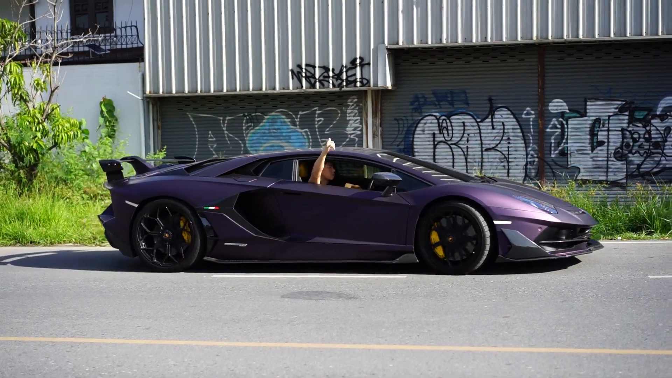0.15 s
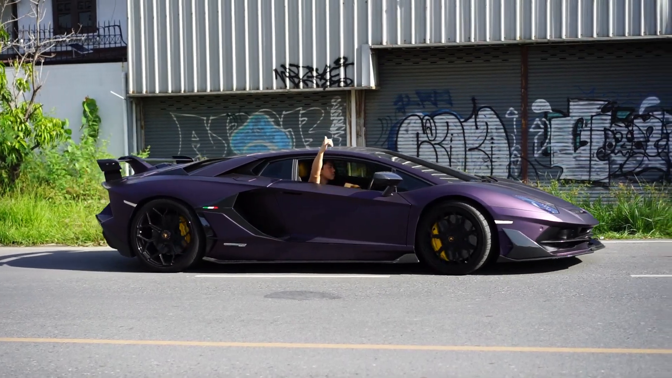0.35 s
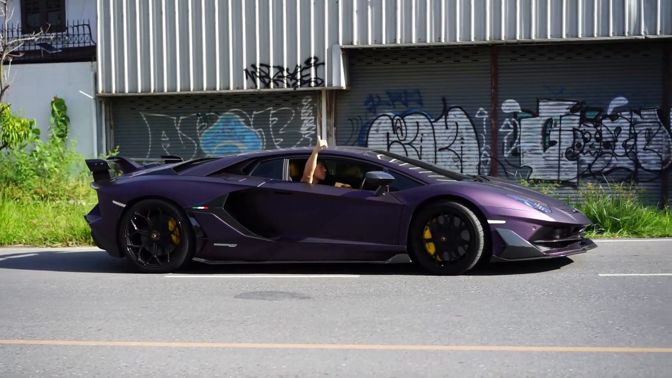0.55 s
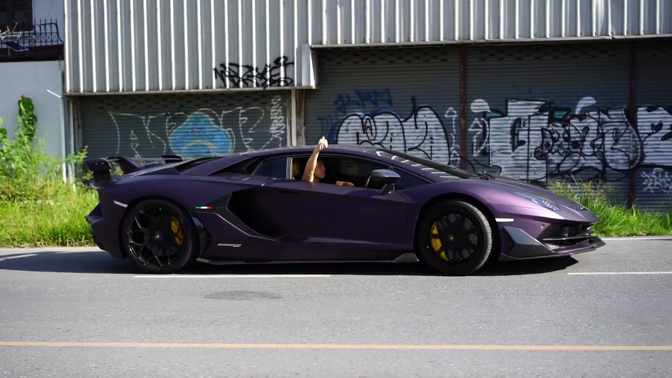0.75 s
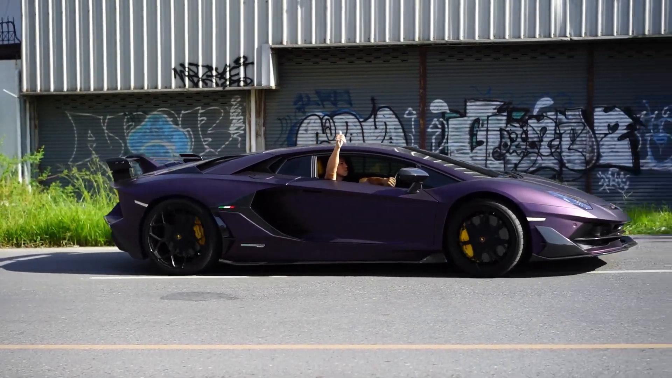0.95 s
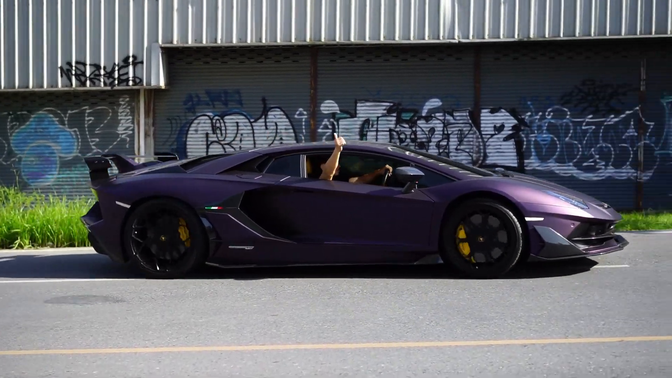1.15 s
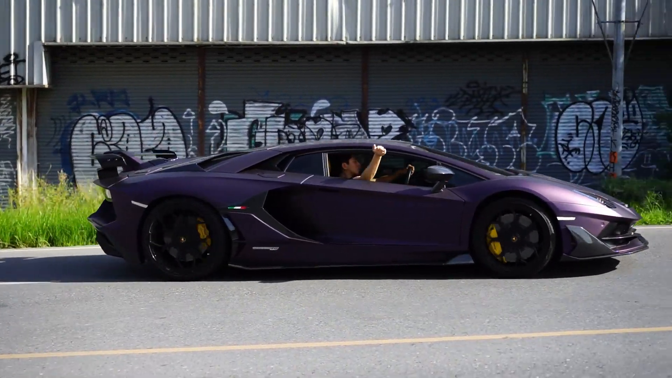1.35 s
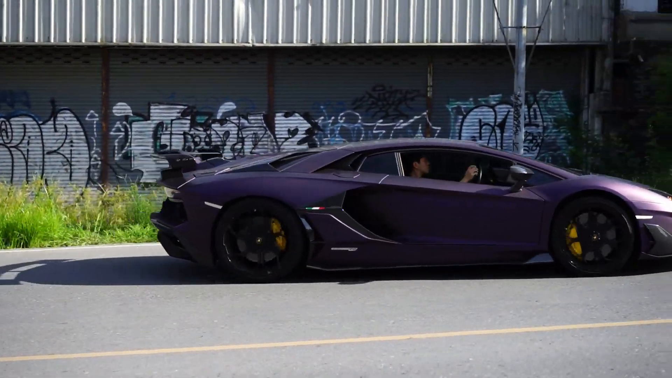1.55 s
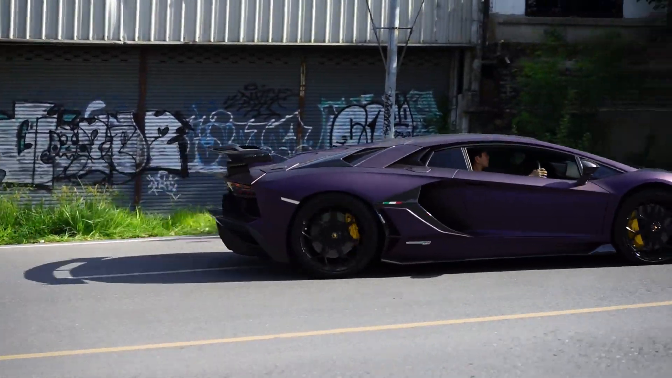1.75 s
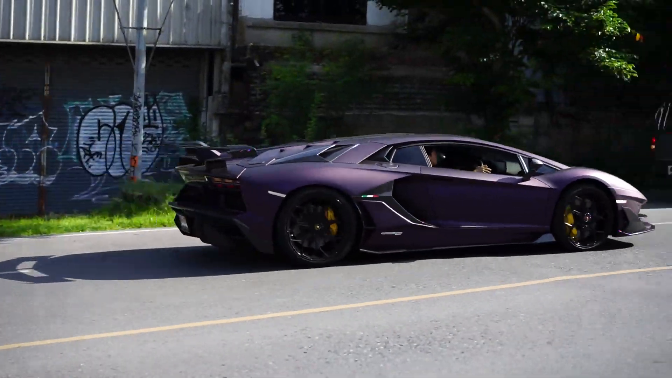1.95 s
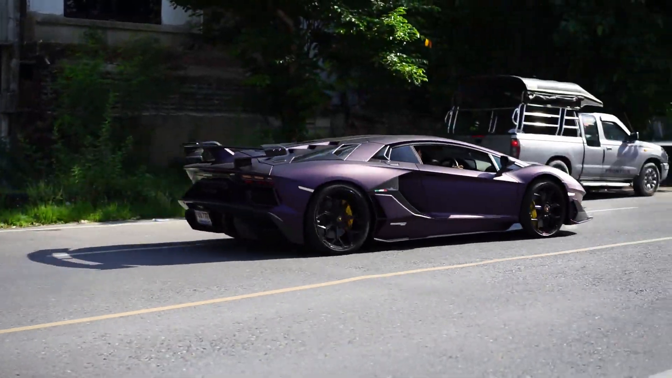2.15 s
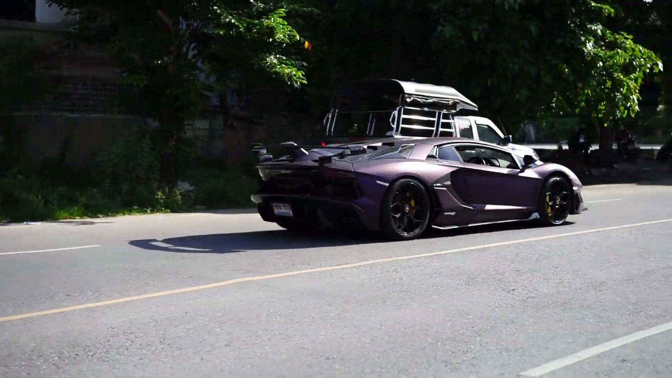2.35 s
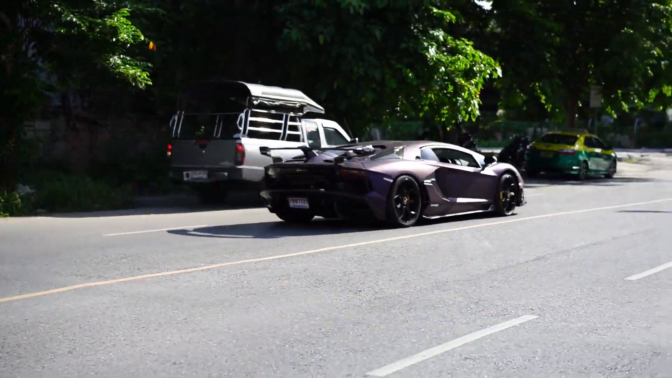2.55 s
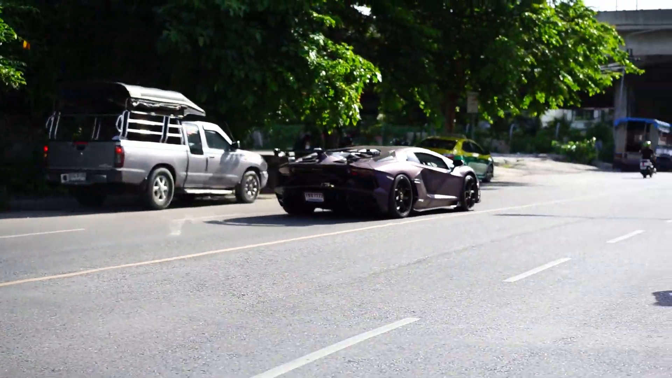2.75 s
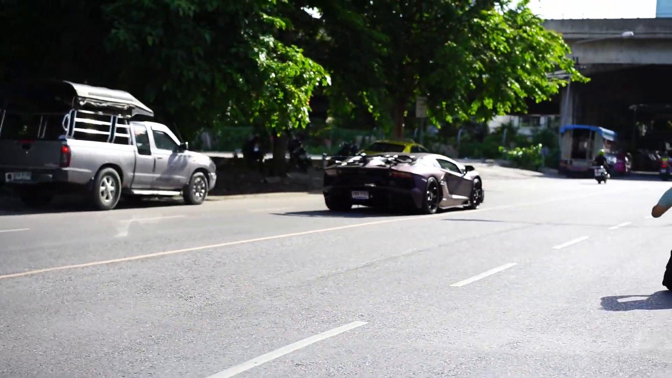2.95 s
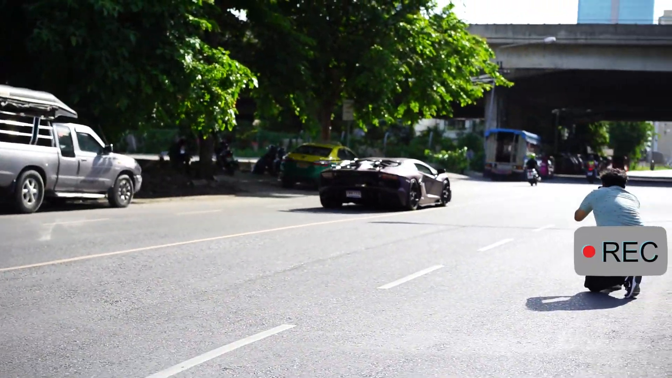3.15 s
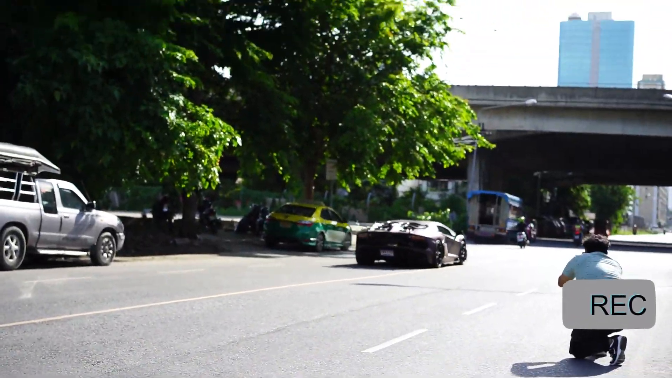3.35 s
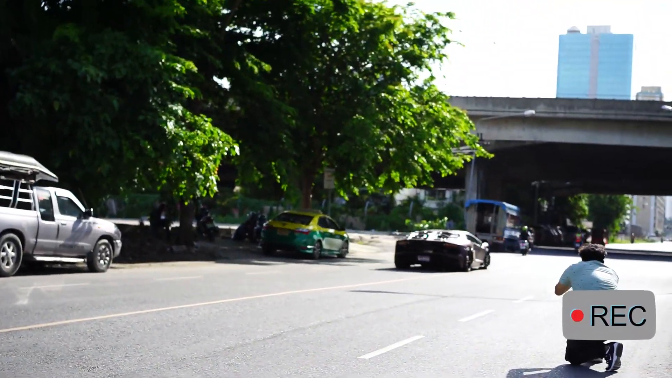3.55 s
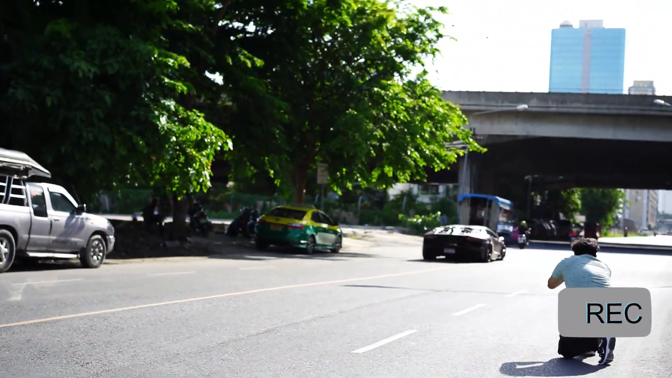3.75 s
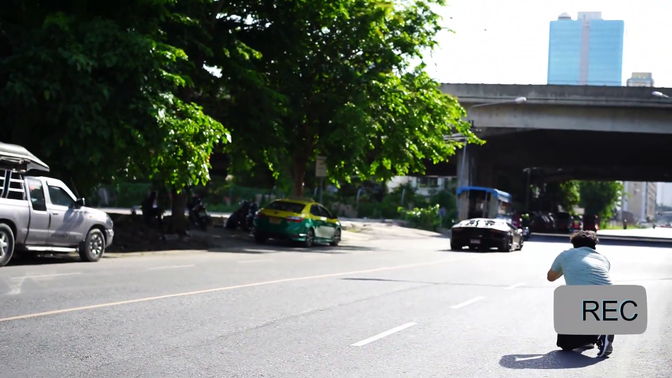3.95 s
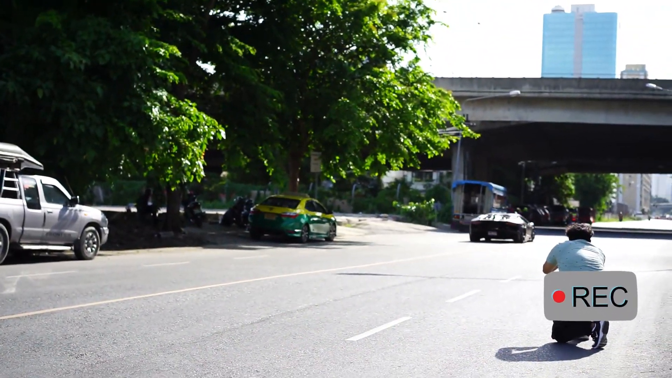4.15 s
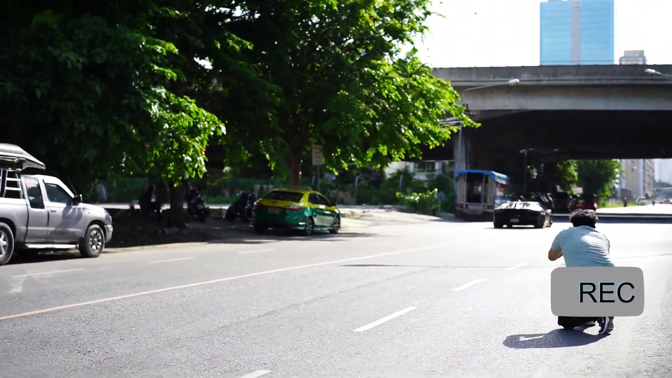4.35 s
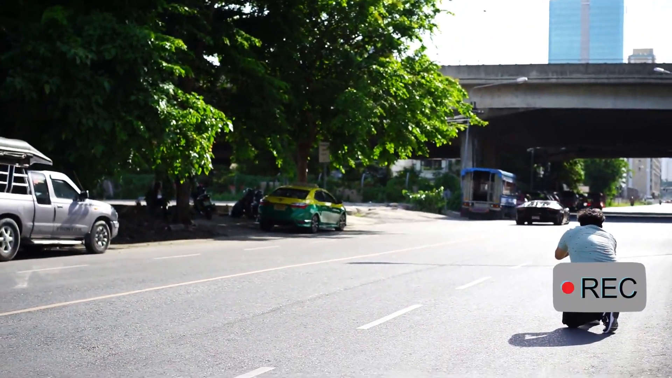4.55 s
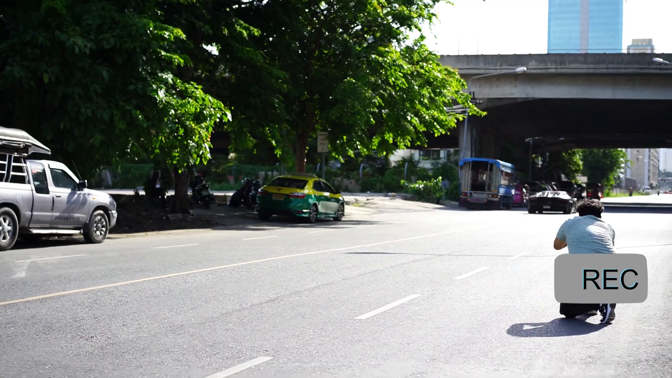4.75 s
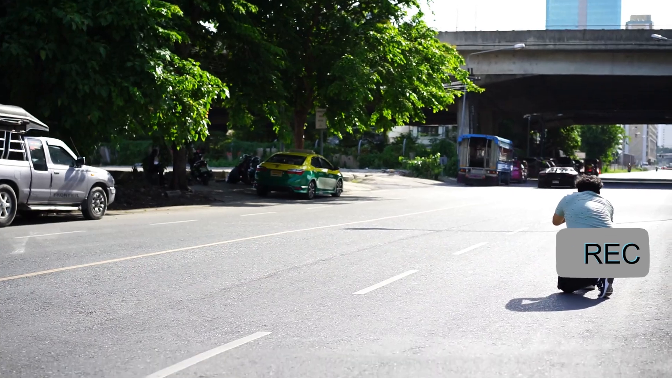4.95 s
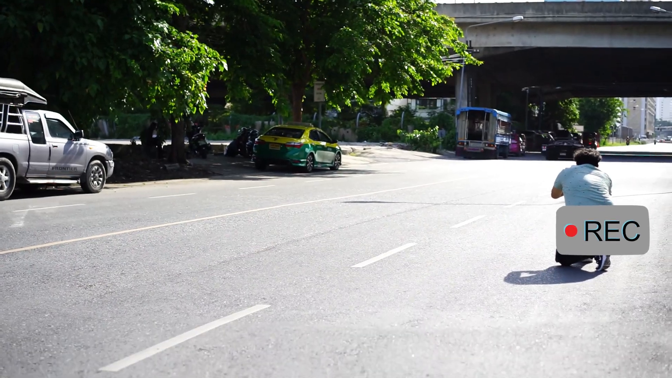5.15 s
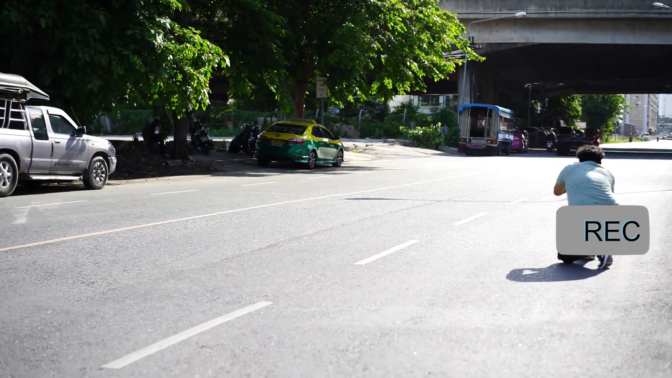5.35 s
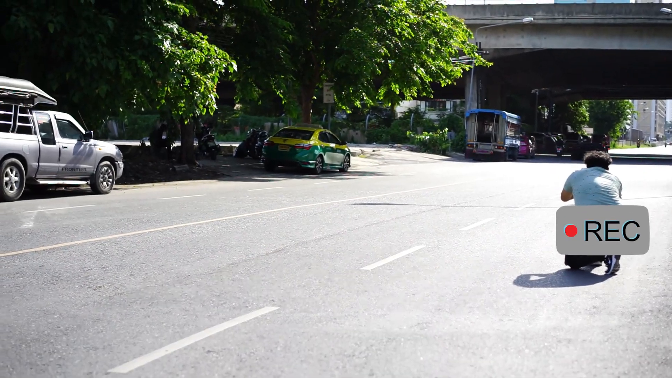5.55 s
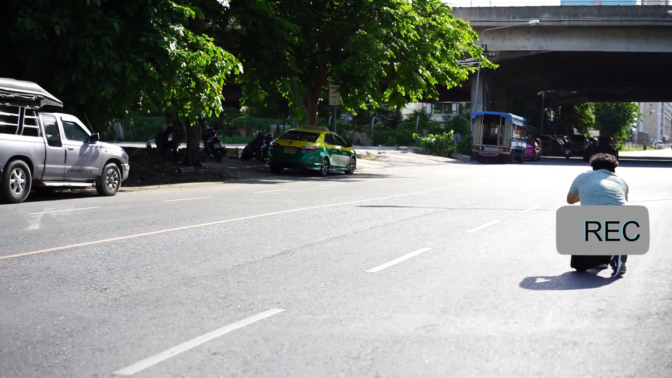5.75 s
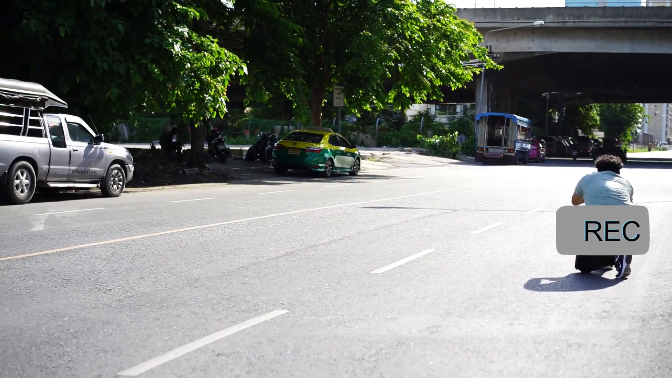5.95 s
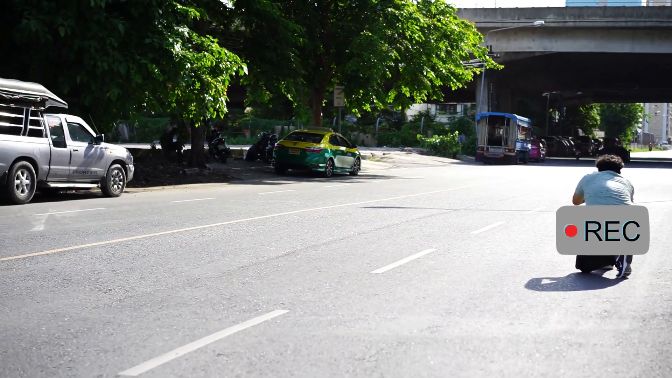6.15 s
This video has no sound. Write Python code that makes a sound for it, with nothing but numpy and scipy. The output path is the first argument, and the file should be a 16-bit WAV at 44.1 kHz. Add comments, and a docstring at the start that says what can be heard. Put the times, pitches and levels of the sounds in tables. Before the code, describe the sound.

Deep held engine growl surges into a raspy climbing howl, stutters with rapid bangs, cracks through a shift, then pops and recedes down the street.

```python
"""A low engine note growls first, held for a moment: a twelve-cylinder sports car about to launch.
It climbs, bangs off its rev limit, cracks into the next gear and pulls away down a street, burbling as the
throttle lifts. Sines at multiples of half one bank's firing rate make the note; filtered noise, chopped by
the firings, makes rasp and sizzle over an unchopped roar. Clicks ringing a pipe make bangs and pops, echoed
by walls; low noise makes the wind on a nearly mono microphone."""
import sys
import numpy as np
from scipy import signal
from scipy.io import wavfile

SR = 44100
rng = np.random.default_rng(int(sys.argv[2]) if len(sys.argv) > 2 else 0)


def transcribe(u):
    """Save the signal u as a 16-bit wav file named by the first command-line argument.

    u: samples, shape (n,) or (channels, n), limited to [-1, 1]; the rate is SR.
    q: integer samples, one column per channel.
    """
    v = np.clip(np.atleast_2d(u).T, -1, 1)
    q = np.round(v * 32767).astype(np.int16)
    wavfile.write(sys.argv[1], SR, q)


N = 273640

# Exhaust note; base is half the firing rate of one bank:
# (time [s], base [Hz], level [dB], extra level of odd multiples [dB])
REVS = [(0.0, 32.83, -25.5, -9), (0.25, 33.04, -28.0, -4), (0.42, 38.14, -25.5, 3.5), (0.49, 41.8, -28, 6),
        (0.62, 55.65, -23, -8), (0.71, 69.5, -24, -9), (0.8, 73.16, -23.5, -3), (0.93, 69.4, -23.5, -6.0),
        (1.0, 66.44, -24.0, -6.0), (1.32, 76.03, -25.0, -2.5), (1.43, 82.5, -27.5, 0.5),
        (1.52, 88.95, -27, -1), (1.6, 94.7, -27.5, 5), (1.68, 97.4, -27.5, -9), (1.85, 97.3, -28, -0.5),
        (1.94, 96.5, -27.5, 2.5), (2.06, 101.9, -27.0, -1.5), (2.29, 113.7, -28.5, -5),
        (2.53, 132.1, -25, -2), (2.64, 138.7, -25.0, 4), (2.71, 142.5, -23.5, -3.5),
        (2.81, 151.1, -21.5, -5.5), (2.97, 150.7, -24.5, 0.5), (3.09, 145.9, -36, 2), (3.19, 137.2, -30, 2),
        (3.34, 125.2, -41.5, 16.5), (3.35, 113.6, -27.5, 18.5), (3.42, 115.9, -22, -4),
        (3.54, 121.4, -20, -5.5), (3.76, 108.7, -25, -0.5), (3.8, 105.7, -28.0, 0.5),
        (3.94, 116, -21.5, -2.5), (4.14, 111.2, -29.5, -5), (4.25, 110.1, -44, 11), (4.44, 111.6, -43.5, 9),
        (4.74, 110.4, -34.5, -1.5), (5.2, 106.6, -36, -3.0), (5.44, 105, -39.0, 0.5), (5.96, 99.46, -39, 0),
        (6.2, 95.8, -43.5, -2)]
# Stages of the run: 0 held, 1 launch, 2 pulling, 3 near the limit, 4 cut, 5 next gear, 6 far off,
# 7 farthest: (time [s], stage [number])
STAGES = [(.52, 0), (.68, 1), (1.32, 1), (1.45, 2), (2.1, 2), (2.5, 3), (2.77, 3), (2.93, 4), (3.34, 4),
          (3.35, 5), (4.2, 5), (4.6, 6), (6.2, 7)]
# Balance of multiples 1 to 8 against the note, one row each: (level in stage 0 [dB], ... stage 7 [dB])
LOW_MULTIPLES = [(-4, -3.5, -2, 0.5, -6.5, -5.5, 4.5, 8.5), (5, 16, 16.5, 16.5, 15.5, 2.5, -6, -7.5),
                 (9, -0.5, -5.5, 0, -3.5, -3.5, -3, -2), (12.5, 7.5, 8, 4, 5, 8, 12, -1),
                 (-13.5, -4.5, 0.5, 0.5, -15, -4, 1.5, -7.5), (12.5, 3, 6.5, 3, -4, 1, 5, 12.5),
                 (-5.5, -23.5, 1, 4, -14, -10, -6.5, 5), (-15.5, 6, 3.5, 5.5, -19, -4, -11.5, -5)]
# Waver of each low multiple: (spread in stage 0 [dB], ... stage 7 [dB])
LOW_WAVER = [2.3, 2.7, 2.21, 1.92, 3.1, 1.49, 1.1, 1]
# Pipe colour on multiples 1 to 8: (frequency [Hz], level [dB])
EXHAUST_COLOUR = [(60.0, 2.5), (79.0, 4), (104.0, -6), (137.0, -4.5), (181.0, 0.7), (239.0, 4), (314.0, -2),
                  (414.0, 5), (546.0, 0.8), (720.0, -5.5), (948.0, -3.5), (1250.0, -6.5)]
# Multiples above 8 together, against the note: (level in stage 0 [dB], ... stage 7 [dB])
HIGH_MULTIPLES = [-27.5, -15.5, 0.5, 4.5, -10, -10, -3.5, -1.5]
# Multiples 9 to 14 against their neighbours, one row each: (level in stage 0 [dB], ... stage 7 [dB])
NEAR_HIGH_MULTIPLES = [(0, -4, -2.5, -1.5, 0, -4.5, 3.5, 5.5), (0, 8, -1.5, 3, 0, 1.5, -2, 5),
                       (0, 0, -6, -3, 0, 1, -2, -2.5), (0, -5, -9.5, 4, 0, -9, -4, -3.5),
                       (0, 1, -2, 2, 0, 0, 5, 0), (0, 1, -4, 0, 0, 0.5, -4.5, -8.5)]
# Pipe colour on multiples above 8: (frequency [Hz], level per line [dB])
HIGH_COLOUR = [(450, 15.5), (700, 2.5), (900, -10.5), (1150, -7.5), (1390, -5), (1560, -23.5), (1780, -19),
               (2250, -17.5), (2700, -30), (3500, -30)]
# Gas flow, one list before and one after the shift:
# (time [s], rasp [dB], sizzle over rasp [dB], roar over its usual share [dB])
GAS_FLOW = [
    [(0.03, -41, -18.5, -4.5), (0.42, -43, -19.5, -1), (0.58, -34.5, -21, 0.5), (0.66, -27, -26.5, 0),
     (0.71, -29, -23.5, 0), (1.1, -29.5, -22.5, -3), (1.2, -33, -20.5, -2), (1.34, -26.5, -22, 0.5),
     (1.7, -34, -15, 3.5), (1.76, -37.5, -18, -4), (2.03, -31, -16.5, -4.5), (2.09, -25, -16, 3.5),
     (2.4, -26, -16.5, -9), (2.53, -27, -8, 2), (2.57, -24, -13.5, -9.5), (2.91, -33, -8.5, 7),
     (2.93, -31.5, -16.5, 9), (3.1, -36.5, -22, 13.5), (3.16, -40, -17.5, 6.5), (3.34, -47.5, -16, 3)],
    [(3.35, -38.5, -21.5, 3), (3.39, -32.5, -14.5, -0.5), (3.74, -36, -18.5, 5.5), (4.02, -37, -20.5, 1.5),
     (4.38, -56, -15.5, 6.5), (4.8, -45.5, -26.5, -0.5), (5.02, -58, -21, 0.5), (5.03, -49, -28, -3.5),
     (5.39, -53, -26, 0.5), (5.83, -51, -28, -0.5), (6.1, -56, -13.5, 3)],
]
# Spectrum of the low turbulence: (frequency [Hz], level per Hz [dB])
ROAR_SPECTRUM = [(65, 10), (100, -8), (300, 1), (600, 0), (900, -8), (1500, -32)]
# Spectrum of the airy top: (frequency [Hz], level per Hz [dB])
SIZZLE_SPECTRUM = [(4000, -19.5), (5000, -13.5), (6200, 14), (7500, 6), (11000, -1), (16000, -4)]
# Side level against mid by frequency, nearly mono: (frequency [Hz], side under mid [dB])
SIDE_LEVEL = [(60, -36.5), (180, -41), (550, -49), (1650, -43), (4970, -37.5), (15000, -4)]
# Tailpipe resonances, lower set: (frequency [Hz], width [Hz], level [dB])
TAILPIPE_LOWER = [(1390, 120, 1.5), (2066, 1150, 0.5), (2456, 754, 2.5)]
# Tailpipe resonances, upper set: (frequency [Hz], width [Hz], level [dB])
TAILPIPE_UPPER_MODES = [(3118, 490, -5), (3897, 396, -1), (4310, 775, -3.5)]
# Share of the upper tailpipe set in the rasp: (time [s], level [dB])
UPPER_SHARE = [(0, -3.5), (1.2, -4), (1.7, 4.5), (2.1, 2.5), (2.3, 1), (2.6, 2.5), (3.4, 2.5), (4.2, 1),
               (4.5, -3), (6.2, -4)]
# Unburnt fuel popping in the pipes: (time [s], strike level [dB])
FUEL_POPS = [(3.183, -9.5), (4.205, -15), (4.222, -19), (4.239, -16), (4.286, -18.5), (4.303, -21),
             (4.335, -28), (4.442, -20), (4.454, -13), (6.129, -19)]
# Pipe tones struck by every bang: (frequency [Hz], level before a common trim [dB])
PIPE_TONES = [(300, -8), (470, 9), (640, -19.5), (900, -26.5)]
# Echoes off the street walls: (delay [s], level [dB])
WALL_ECHOES = [(.021, 0.5), (.047, -9), (.083, -29)]
# Wind rumble: (time [s], level [dB])
WIND_LEVEL = [(0.0, -31), (0.38, -36.5), (0.41, -29), (1.0, -37.5), (1.1, -29), (1.5, -44.5), (4.33, -45.5),
              (4.4, -20.5), (4.73, -37.5), (4.89, -30), (5.2, -38), (6.2, -46)]

ODD_DB = -3   # odd multiples come only from the unevenness between cylinders
UNEVEN_DB = 2.2   # spread of each multiple above 8
SPARK_CUT_S, SPARK_CUT_DB = 2.97, -16   # the note drops while the bangs are hardest
ROUGH_S, ROUGH_RAD = 1.3, .09   # the growl turns ragged: timing shake per multiple
ROAR_DB, ROAR_FOLLOWS = -25, 0.54   # level at a rasp of -30 dB; share of the rasp's swing
THIN_S, THIN_HZ, THIN_SHARE = 1.8, 150, 0.62   # at high revs the roar loses bass
# Shock level over turbulence: usual, at its top, time and width of the top
SHOCK_DB, SHOCK_TOP_DB, SHOCK_TOP_S, SHOCK_WIDTH_S = -14, 3, 2.62, .15
LIMIT_START_S, LIMIT_PAIR_S, LIMIT_LATE = 2.880, .0205, .42   # late: second bang, in pair spacings
LIMIT_DB, LIMIT_ATTACK_S, LIMIT_HOLD_S, LIMIT_RELEASE_S = -5.5, .15, .08, .04   # dB at full bite
LIMIT_BRIGHT_DB, LIMIT_BRIGHTENS_DB_PER_S = -28, 55   # crack against bang, at full bite
SHIFT_S, SHIFT_GAP_S, SHIFT_DB, SHIFT_BRIGHT_DB = 3.3475, .0066, -2.5, -41   # cracks as the gear goes in
POP_BRIGHT_DB = -38
BURBLE_S, BURBLE_DB, BURBLE_HOLD_S, BURBLE_RELEASE_S = 4.19, -21, .14, .17   # small pops off the throttle
PIPE_T60_S = .018
THUD_HZ, THUD_DB, THUD_T60_S = 107, -6, 0.042
HISS_DB = -79   # the microphone's own noise
CUTOFF_HZ = 15746


def note(base_hz, turns, level_db, odd_db):
    """Sines locked to the firings and nearly in step, so that each pulse has a steep flank."""
    out, stage = np.zeros(N), in_time(STAGES)[0]
    turns = turns + ROUGH_RAD * swell(ROUGH_S, .08, .2, .15) * drift(40)
    waver_db = in_stage(stage, LOW_WAVER)
    for k, stage_db in enumerate(LOW_MULTIPLES, 1):
        db = level_db + in_stage(stage, stage_db) + at_hz(EXHAUST_COLOUR, k * base_hz)
        db = db + odd_db * (k % 2) + waver_db * drift(14.2)
        out += np.sqrt(2) * from_db(db) * np.sin(k * turns + 1.22 * drift(0.92))
    high_db = level_db + in_stage(stage, HIGH_MULTIPLES)
    for k in range(9, 31):
        db = high_db + at_hz(HIGH_COLOUR, k * base_hz)
        db = db + (ODD_DB + odd_db / 2) * (k % 2) + UNEVEN_DB * drift(2.3)
        if k < 15:
            db = db + in_stage(stage, NEAR_HIGH_MULTIPLES[k - 9])
        out += from_db(db) * np.sin(k * turns + .6 * drift(8))
    return out


def flow(turns):
    """Turbulent gas: noise as roar, rasp and sizzle, the last two chopped and shocked by the firings."""
    rasp_db, bright_db, roar_db = in_time(GAS_FLOW[0] + GAS_FLOW[1])
    roar_db = roar_db + ROAR_DB + ROAR_FOLLOWS * (rasp_db + 30)
    sizzle_db = rasp_db + bright_db
    white = rng.standard_normal((2, 2, N))   # two (mid, side) pairs
    chop = 1 + .3 * np.cos(2 * turns) + .2 * np.cos(turns)
    shocks = firing_shocks(turns)
    push = white[0, 0] * chop * from_db(0.74 * drift(10))
    sizzle_push = white * chop + from_db(-12) * shocks * [[1], [0]]   # shocks in the mid only
    sizzle = banded(sizzle_push, SIZZLE_SPECTRUM, patchy_db=.8)
    return (from_db(roar_db) * roar(white[::-1]) + from_db(rasp_db) * rasp(push, shocks)
            + from_db(sizzle_db) * sizzle)


def firing_shocks(turns):
    """At high revs each firing steepens to a shock: clicks whose level peaks near the top of the climb."""
    top = np.exp(-((np.arange(N) / SR - SHOCK_TOP_S) / SHOCK_WIDTH_S) ** 2)
    count = np.floor(turns / np.pi)
    firing = np.diff(count, prepend=0)   # one click per firing of a bank
    weak = count % 2   # every other one is weaker
    clicks = rms_one(firing * from_db(-5 * weak + rng.normal(0, 0.57, N)))
    return clicks * from_db(SHOCK_DB + (SHOCK_TOP_DB - SHOCK_DB) * top)


def rasp(push, shocks):
    """Chopped gas and shocks ring the lower and upper tailpipe resonances; rms 1."""
    lower = resonate(push + 0.64 * shocks, TAILPIPE_LOWER)
    upper = resonate(push + shocks, TAILPIPE_UPPER_MODES)
    both = lower + from_db(in_time(UPPER_SHARE)[0]) * upper
    return rms_one(filtered(both, 3, [1100, 5000], "band"))


def roar(white):
    """Low turbulence as banded noise, partly stripped of its bass at high revs."""
    full = banded(white, ROAR_SPECTRUM, patchy_db=.6)
    thin = THIN_SHARE * swell(THIN_S, 0.55, 1.18, 0.52)
    return (1 - thin) * full + thin * filtered(full, 2, THIN_HZ, "high")


def bangs():
    """Limiter bangs, cracks, pops and burble strike the same pipe; the bright ones add a puff of noise."""
    soft, sharp = np.zeros(N), np.zeros(N)
    limiter_bangs(soft, sharp)
    lifted = swell(BURBLE_S, .005, BURBLE_HOLD_S, BURBLE_RELEASE_S)
    pop_here = rng.random(N) < 130 / SR   # 130 chance pops a second
    soft += lifted * pop_here * from_db(BURBLE_DB + rng.normal(0, 1.7, N))
    strikes = [(SHIFT_S + SHIFT_GAP_S * k, SHIFT_DB + rng.normal(0, 1.1), SHIFT_BRIGHT_DB) for k in range(6)]
    strikes += [(s, db, POP_BRIGHT_DB) for s, db in FUEL_POPS]
    for s, strike_db, bright_db in strikes:
        soft[round(s * SR)] += from_db(strike_db)
        sharp[round(s * SR)] += from_db(strike_db + bright_db)
    body = sum(from_db(db - 6.5) * ring(soft, hz, PIPE_T60_S) for hz, db in PIPE_TONES)
    body += from_db(THUD_DB) * ring(soft, THUD_HZ, THUD_T60_S)
    puff = signal.lfilter([1], [1, -np.exp(-1 / (0.003 * SR))], sharp)   # 3 ms decay
    crack = puff * rng.standard_normal(N)
    return filtered(body, 3, [70, 1500], "band") + filtered(crack, 2, [900, 4500], "band")


def limiter_bangs(soft, sharp):
    """Adds thirteen pairs of clicks, slightly uneven, that follow the limiter's bite and brighten in time."""
    pairs = LIMIT_START_S + LIMIT_PAIR_S * np.arange(13)
    times = np.concatenate([pairs, pairs + LIMIT_LATE * LIMIT_PAIR_S])
    at = (times * SR + rng.normal(0, 10.6, 26)).astype(int)
    bite = limiter()[at]
    bright_db = LIMIT_BRIGHT_DB + LIMIT_BRIGHTENS_DB_PER_S * (at / SR - LIMIT_START_S)
    soft[at] = bite * from_db(LIMIT_DB + rng.normal(0, 2.33, len(at)))
    sharp[at] = soft[at] * bite * from_db(bright_db + rng.normal(0, 3.5, len(at)))


def limiter():
    """How hard the rev limit bites, 0 to 1."""
    return np.sqrt(swell(LIMIT_START_S, LIMIT_ATTACK_S, LIMIT_HOLD_S, LIMIT_RELEASE_S))


def street(x):
    """A few dull echoes off the walls: delayed, low-passed copies."""
    dull, out = signal.lfilter([.25], [1, -.75], x), x.copy()
    for delay_s, db in WALL_ECHOES:
        lag = round(delay_s * SR)
        out[lag:] += from_db(db) * dull[:-lag]
    return out


def wind():
    """Lumpy rumble below the engine: noise in a very low band."""
    low = filtered(rng.standard_normal(N + SR), 3, [15, 33], "band")[SR:]   # skip the filter's start
    return from_db(in_time(WIND_LEVEL)[0]) * rms_one(low)


def from_db(db):
    """Gain of a level in dB."""
    return 10 ** (np.asarray(db) / 20)


def rms_one(x):
    """Scaled to rms 1."""
    return x / np.sqrt(np.mean(x ** 2) + 1e-20)


def in_time(rows):
    """Columns of a table, one value a sample."""
    s, *columns = np.transpose(rows)
    return [np.interp(np.arange(N) / SR, s, c) for c in columns]


def in_stage(stage, values):
    """Eight stage settings, blended between stages."""
    return np.interp(stage, range(8), values)


def at_hz(points, hz):
    """A spectrum read on a log-frequency axis."""
    table_hz, db = np.transpose(points)
    return np.interp(np.log(hz), np.log(table_hz), db)


def swell(start_s, attack_s, hold_s, release_s):
    """Rise, hold and fall between 0 and 1."""
    corners_s = start_s + np.cumsum([0, attack_s, hold_s, release_s])
    return np.interp(np.arange(N) / SR, corners_s, [0, 1, 1, 0])


def drift(rate):
    """Slow chance, spread 1: low-passed noise made at every 40th sample."""
    r = np.exp(-80 * np.pi * rate / SR)
    slow = signal.lfilter([1], [1, -2 * r, r * r], rng.standard_normal(N // 40 + 2002))[2000:]
    return np.interp(np.arange(N) / 40, np.arange(len(slow)), rms_one(slow))


def filtered(x, order, hz, kind):
    """Butterworth filter."""
    return signal.sosfilt(signal.butter(order, hz, kind, fs=SR, output="sos"), x)


def ring(clicks, hz, t60):
    """A unit click sets a decaying sine of height 1 ringing."""
    r, w = from_db(-60 / (t60 * SR)), 2 * np.pi * hz / SR
    return signal.lfilter([0, np.sin(w)], [1, -2 * r * np.cos(w), r * r], clicks + 1e-18)


def resonate(x, modes):
    """Parallel resonances, signs alternating."""
    out = 0
    for k, (hz, width, db) in enumerate(modes):
        r = np.exp(-np.pi * width / SR)
        zeros = [(1 - r * r) / 2, 0, (r * r - 1) / 2]
        poles = [1, -2 * r * np.cos(2 * np.pi * hz / SR), r * r]
        out = out + (-1) ** k * from_db(db) * signal.lfilter(zeros, poles, x)
    return out


def banded(excite, spectrum, patchy_db):
    """Half-octave bands with their own level, flicker and a faint side signal; rms 1."""
    out, together = 0, drift(20)
    edges = np.exp(np.arange(np.log(spectrum[0][0]), np.log(spectrum[-1][0]) + .1, np.log(2) / 2))
    for k, (low, high) in enumerate(zip(edges, edges[1:])):
        mid, side = filtered(excite[k % 2], 2, [low, high], "band")
        hz = np.sqrt(low * high)
        gain = from_db(at_hz(spectrum, hz) + patchy_db * (1.6 * together + drift(10.2)))
        out = out + gain * (mid + from_db(at_hz(SIDE_LEVEL, hz)) * side * [[1], [-1]])
    return rms_one(out)


def scene():
    """Note, flow, bangs and wind."""
    base_hz, level_db, odd_db = in_time(REVS)
    level_db = level_db + SPARK_CUT_DB * swell(SPARK_CUT_S, 0.049, 0.058, 0.044)
    turns = 2 * np.pi * np.cumsum(base_hz) / SR   # phase of the base, two bank firings a cycle
    return note(base_hz, turns, level_db, odd_db) + flow(turns) + street(bangs()) + wind()


def record(dry):
    """Microphone hiss and a short fade-in; peaks are rounded, subsonics and the top are cut."""
    fade = np.minimum(np.arange(N) / (.012 * SR), 1)
    hissing = fade * dry + from_db(HISS_DB) * rng.standard_normal(N)
    rounded = 1.1 * np.tanh(hissing / 1.1)
    wet = filtered(rounded, 2, 18, "high")
    return signal.sosfilt(signal.ellip(16, .5, 90, CUTOFF_HZ, fs=SR, output="sos"), wet)


dry = scene()
out = record(dry)
transcribe(out)
```